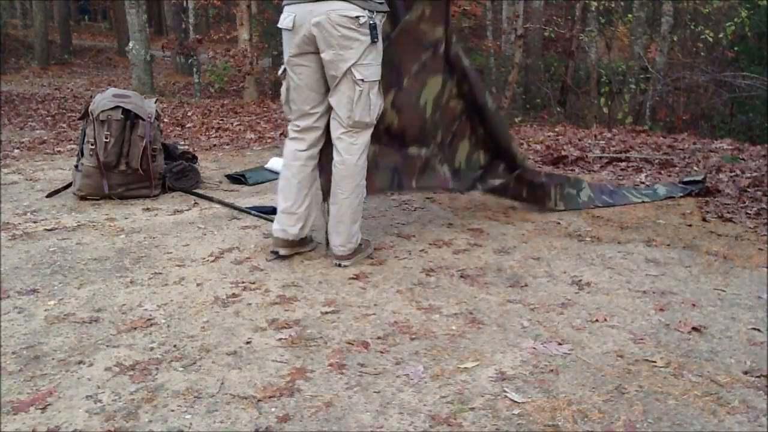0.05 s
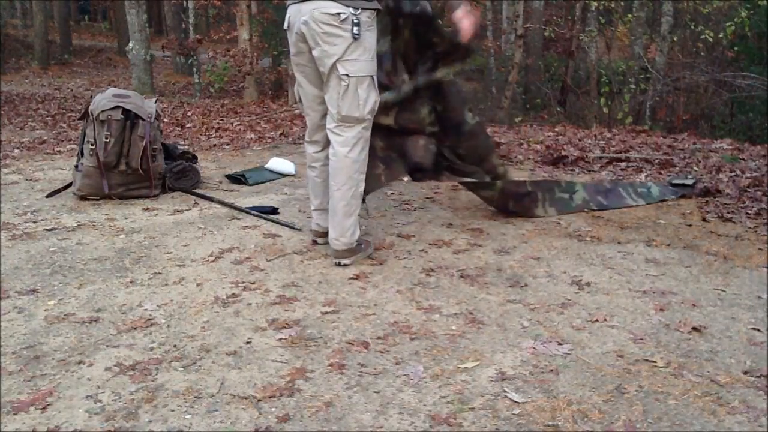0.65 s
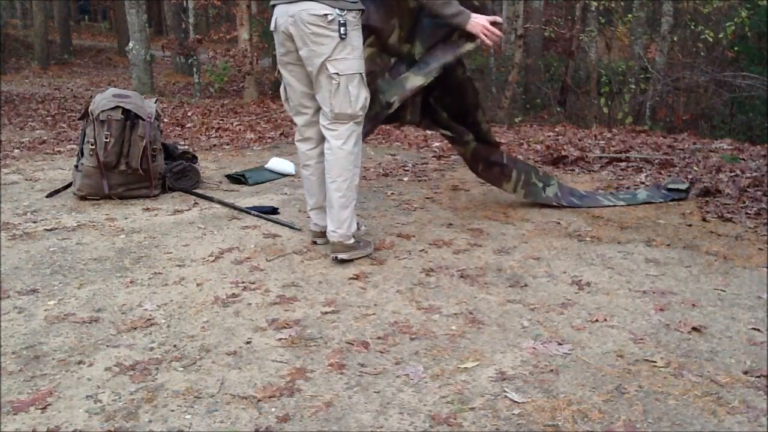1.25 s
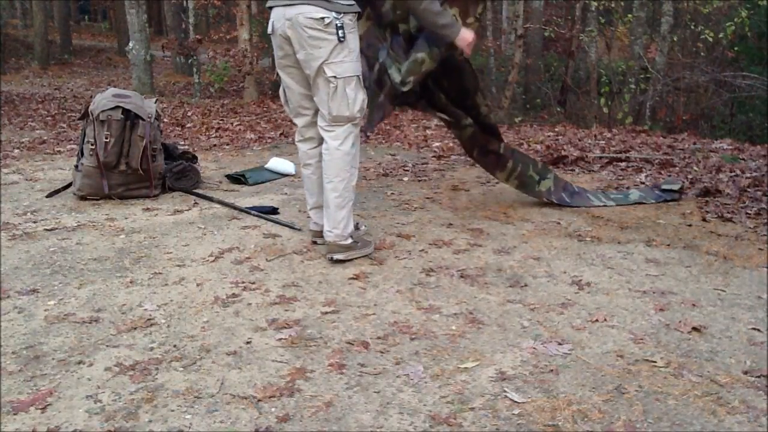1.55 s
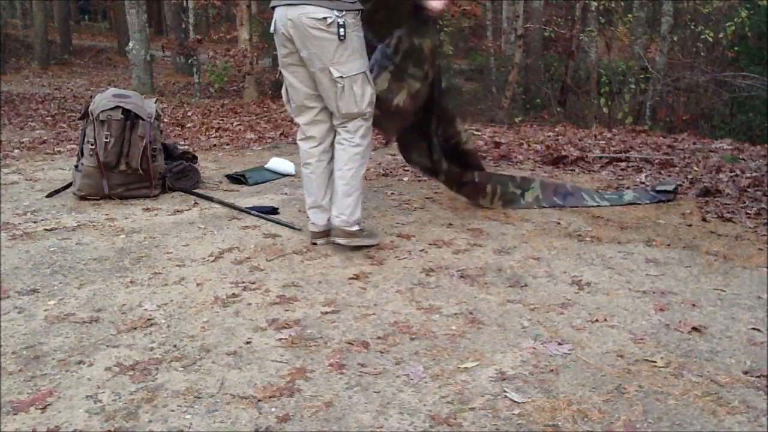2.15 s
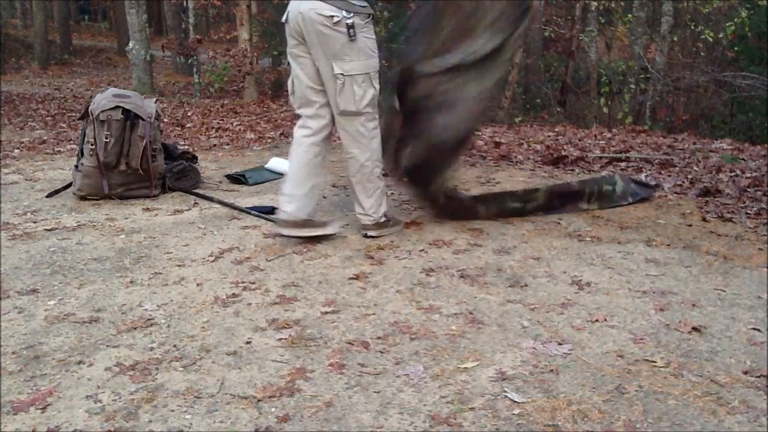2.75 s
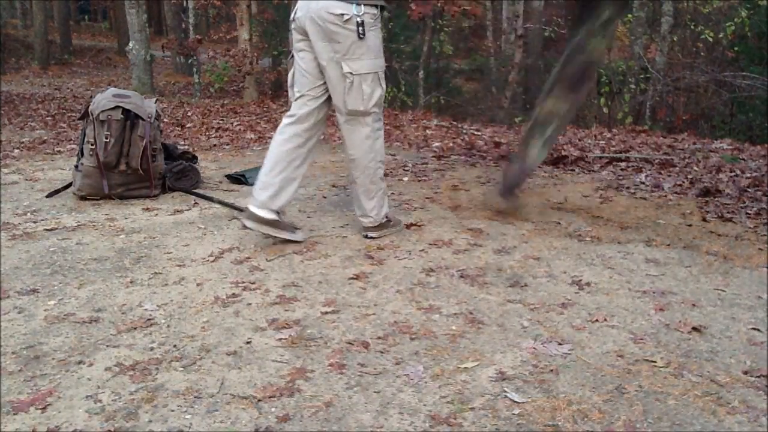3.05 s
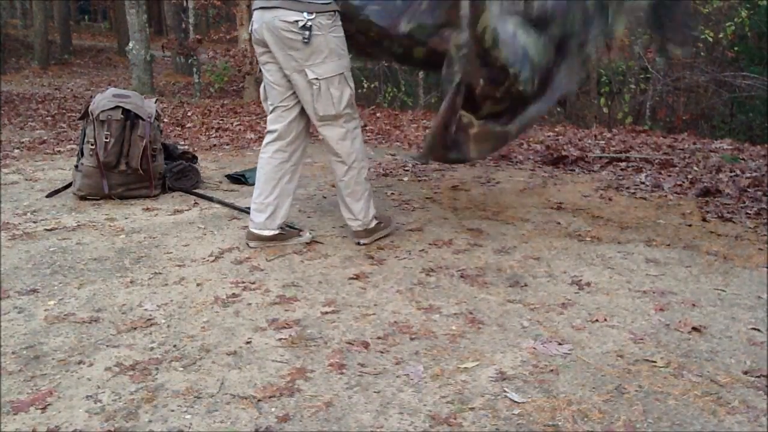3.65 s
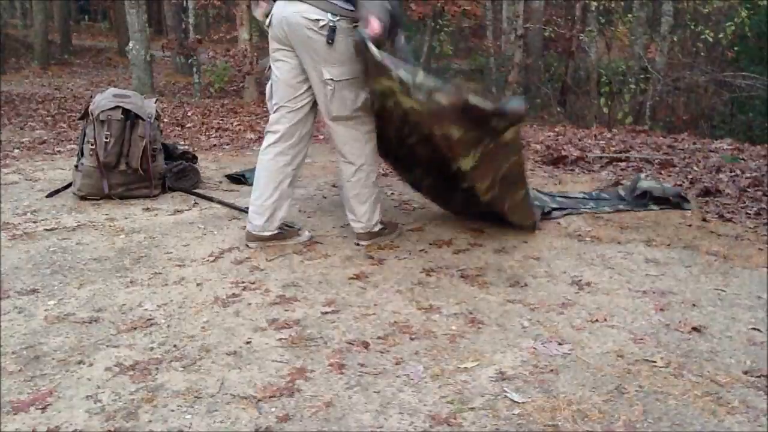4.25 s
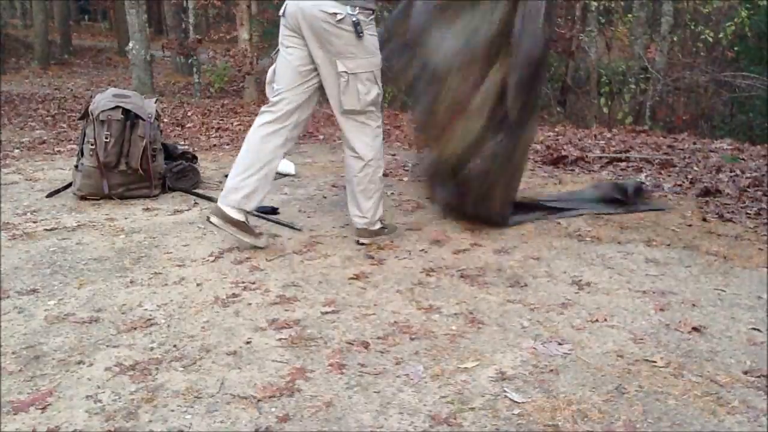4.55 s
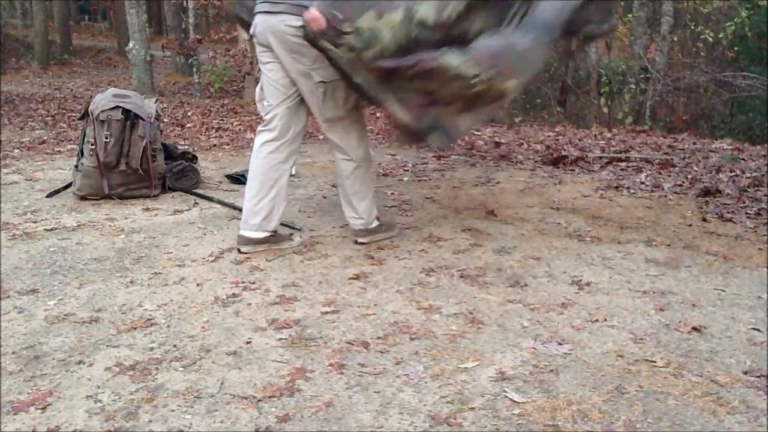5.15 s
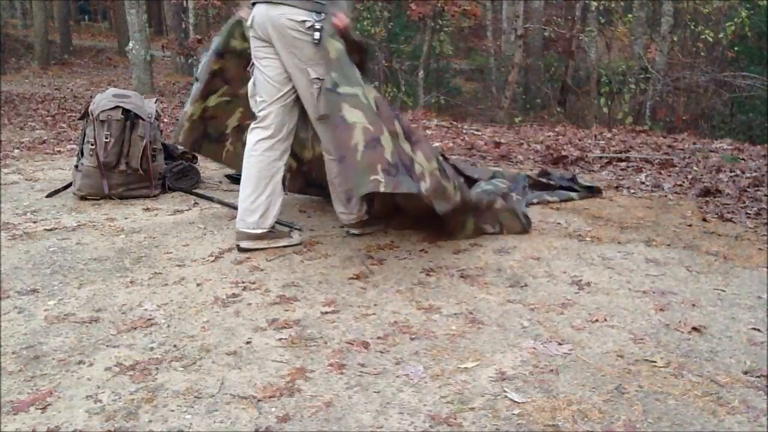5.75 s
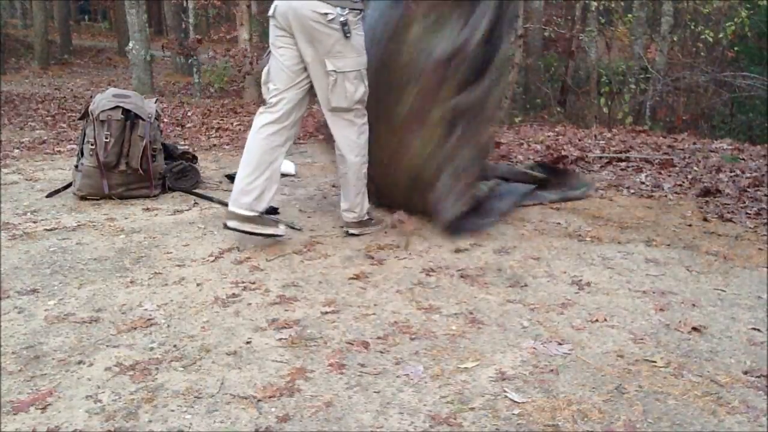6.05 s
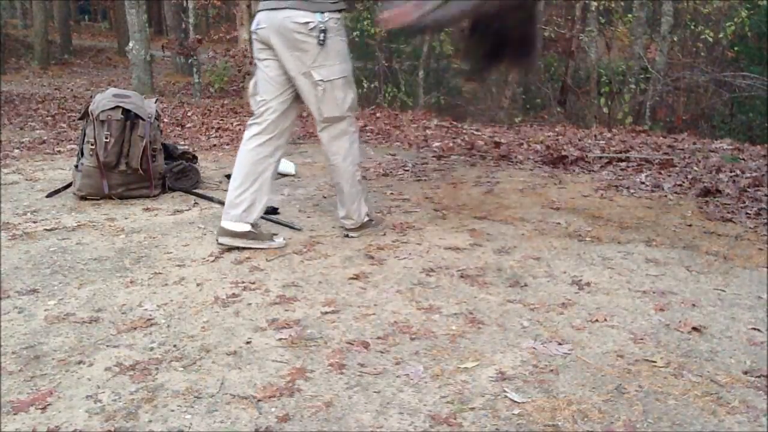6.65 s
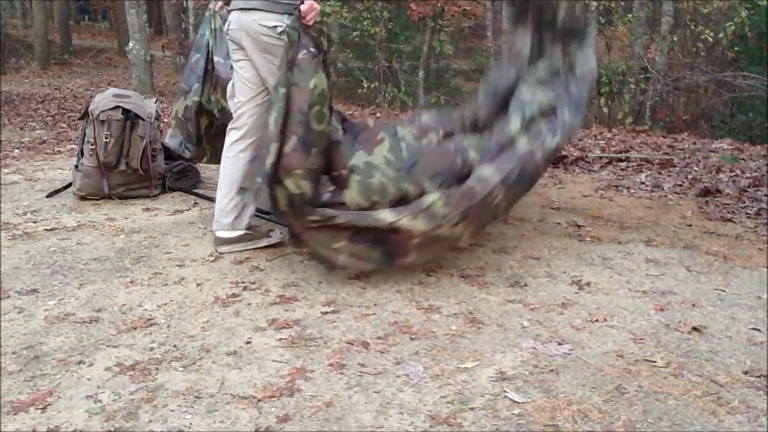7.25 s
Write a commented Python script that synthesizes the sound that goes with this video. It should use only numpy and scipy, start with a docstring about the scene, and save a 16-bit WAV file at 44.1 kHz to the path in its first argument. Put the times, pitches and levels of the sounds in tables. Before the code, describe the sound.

Soft cloth rustling gives way to three loud rounds of tarp flaps and swishes outdoors, with a far-off engine drone underneath.

```python
"""In the woods, on sandy ground: a fabric tarp is gathered up and shaken out three times near the mic.
Cloth slides on cloth with a hiss, its ribbed weave zips, folds buckle and creases crackle.
The sheet billows in soft puffs and its edge snaps taut; the trunks return a thin, dull tail.
Far off, traffic and two droning engines lie underneath."""
import sys
import numpy as np
from scipy import signal
from scipy.fft import rfft, irfft, next_fast_len
from scipy.io import wavfile
from scipy.ndimage import map_coordinates

SR = 44100
rng = np.random.default_rng(int(sys.argv[2]) if len(sys.argv) > 2 else 0)


def to_wav(s):
    """Save 16-bit WAV."""
    ch = np.atleast_2d(s).T  # columns
    pcm = np.round(np.clip(ch, -1, 1) * 32767)  # PCM
    wavfile.write(sys.argv[1], SR, pcm.astype(np.int16))


N = 322371
TIME = np.arange(N) / SR

# the arms whip the tarp upward: full speed at t/s, hold/s, relative level/dB
UPSWINGS = [(2.755, 0.054, -33.5), (4.519, 0.055, -28.5), (6.045, .15, -33.5)]
# the sheet flies out and unfurls: full speed at t/s, hold/s, relative level/dB
FLIGHTS = [(3.13, 0.15, -40), (4.96, 0.14, -36.5), (6.65, 0.22, -40.5)]
# it comes down and drags over sand and legs: full speed at t/s, hold/s, relative level/dB
DRAGS = [(4.065, 0.08, -42.5), (5.665, 0.056, -41), (7.015, 0.011, -43.5)]
# the hands pull in a length of cloth: full speed at t/s, hold/s, relative level/dB
HAND_PULLS = [(.14, 0.025, -52.5), (.31, .01, -58), (.49, .32, -53.5), (.57, 0.025, -49), (1.0, .1, -54),
              (1.32, .12, -54.5), (1.89, 0.0092, -54), (2.06, 0.3, -47), (2.61, 0.042, -50),
              (2.96, .02, -42.5), (3.49, 0.019, -46.5), (3.74, .01, -52), (3.94, .02, -47),
              (5.58, .01, -49.5), (5.83, 0.012, -57), (6.47, 0.042, -44)]
# cloth stirring between movements, quietest while bunched in the hands: t/s, relative level/dB
STIR_LEVELS = [(0, -57.5), (.4, -54.5), (.9, -68), (1.8, -62.5), (2.4, -52), (7.3, -57)]
# cloth pulled taut: t/s, level/dB, f/Hz, ripple decay/s
TAUT_SNAPS = [(2.0598, -16, 2450, 0.0033), (2.734, -17, 1090, .009), (2.792, -14, 1590, .0027),
              (2.8524, -14, 1890, .0045), (3.115, -20, 896, .0022), (3.203, -16, 980, 0.0092),
              (3.2329, -11, 1190, 0.0024), (3.279, -20.5, 540, 0.0081), (3.608, -21.5, 1700, 0.0035),
              (4.134, -22, 2200, 0.0096), (4.5102, -6.5, 1700, 0.0087), (4.5574, -14.5, 586, 0.0026),
              (4.612, -19, 890, 0.012), (4.8855, -12, 458, 0.002), (5.089, -20.5, 1200, .0048),
              (5.194, -21, 1430, 0.016), (5.957, -21.5, 900, 0.0059), (6.148, -8.5, 1493, 0.0079),
              (6.6655, -13, 1190, 0.0074), (7.032, -23, 1100, 0.0024)]
# the sheet catches air: middle t/s, half length/s, level/dB, f/Hz
AIR_PUFFS = [(0.607, 0.025, -48, 170), (2.774, 0.051, -37.5, 213), (4.065, 0.026, -36, 413),
             (4.52, 0.026, -25, 290), (4.625, 0.027, -31, 180), (4.889, 0.016, -27.5, 400),
             (4.977, 0.13, -37.5, 476), (5.68, 0.057, -37.5, 350), (6, 0.073, -39.5, 220),
             (6.66, 0.029, -36.5, 333)]
# weave zipping as the sheet flies out and unfurls, or on a hard jerk:
# middle t/s, half length/s, level/dB, start f/Hz, end f/Hz
WEAVE_ZIPS = [(3.192, 0.09, -38.5, 4740, 6100), (3.232, 0.0014, -24, 4940, 5100),
              (4.892, 0.1, -38, 4800, 5440), (5.08, 0.16, -46, 5870, 7140), (6.482, 0.069, -44, 4250, 4860),
              (6.737, 0.29, -44, 5380, 6250)]
# single creases flicking over: t/s, peak level/dB
CREASE_FLICKS = [(0.157, -35), (.56, -34), (.649, -38), (.707, -41), (1.098, -35), (1.67, -39.5),
                 (1.877, -36.5), (2.058, -23), (2.077, -26), (2.311, -33), (3.09, -21), (4.445, -23),
                 (6.034, -21), (6.497, -29)]
# spectrum of sliding cloth: f/Hz, relative level/dB
SLIDE_SPECTRUM = [(300, -22), (1000, -3), (2500, -3.5), (4500, -1.5), (7000, 0), (10000, 0), (15000, -3.5)]
# spectrum of buckling folds: f/Hz, relative level/dB
FOLD_SPECTRUM = [(50, -48.5), (130, -6), (350, 2.5), (800, 0.5), (1400, 2), (2600, -1.5), (4000, -7),
                 (7000, -19.5), (15000, -23)]
# spectrum of crease clicks: f/Hz, relative level/dB
CREASE_SPECTRUM = [(500, -24), (2000, 6), (4500, 6), (9000, 2.5), (15000, -11.5)]
# spectrum of the distant road: f/Hz, relative level/dB
ROAD_SPECTRUM = [(25, -27), (50, -11), (70, -12), (100, -5), (150, 0.5), (320, -1.5), (550, 2), (900, 5),
                 (1300, 0.5), (2000, -13), (4000, -24), (15000, -25)]
# the higher engine: t/s, firing f/Hz, level/dB of harmonics 1, 2, 3
HIGH_DRONE = [(0, 83.3, -73, -84, -73), (1.1, 82.7, -62.5, -67, -56.5), (1.7, 83.64, -65, -54, -63.5),
              (2.2, 82, -65, -53, -60.5), (2.8, 83.3, -71, -56.5, -66.5), (4.3, 81.8, -65.5, -63, -56.5),
              (7.3, 82.5, -69, -61.5, -84)]
# the lower engine: t/s, firing f/Hz, level/dB
LOW_DRONE = [(0, 73.5, -66), (2.2, 72, -62.5), (4.2, 71.2, -72), (5.5, 65.2, -77), (7.3, 67.3, -80.5)]


def handling():
    """The tarp's movements set how hard the cloth slides and buckles: two level curves in dB."""
    whip = strokes(UPSWINGS, attack_s=.065, release_s=.13)
    settling = from_db(-13.5) ** 2 * strokes(FLIGHTS, attack_s=.064, release_s=.67)  # the sheet sinks
    flight = strokes(FLIGHTS, attack_s=.14, release_s=.078) + settling
    drag = strokes(DRAGS, attack_s=.03, release_s=.022)
    stir_db, = in_time(STIR_LEVELS)
    hands = strokes(HAND_PULLS, attack_s=.046, release_s=.084) + from_db(stir_db) ** 2
    hiss_db = 10 * np.log10(whip + flight + drag + hands)
    crumple = whip * (whip / whip.max()) ** .2  # the harder the whip, the more of it buckles
    folds_db = 10 * np.log10(crumple + from_db(.54) ** 2 * flight + drag + from_db(-.55) ** 2 * hands)
    return hiss_db, np.interp(TIME + .0065, TIME, folds_db)  # folds buckle just before the cloth slides


def strokes(rows, attack_s, release_s):
    """Power of a set of movements: each swells up to speed, holds and dies away."""
    power, t = 0, TIME[::SR // 1000]
    for s, hold, db in rows:
        rise = (np.maximum(s - t, 0) / attack_s) ** 1.6
        fall = np.maximum(t - s - hold, 0) / release_s
        power += (from_db(db) * np.exp(-np.minimum(rise + fall, 20))) ** 2
    return np.interp(TIME, t, power)


def sliding(level_db):
    """Threads catch and let go: a fine hiss with ticks, which stand apart when the cloth moves slowly."""
    per_s = 1500 * from_db(.8 * (np.clip(level_db, -62, -30) + 35.5))
    friction = rng.standard_normal(N) + from_db(-10) * grains(per_s, spread_db=7.5)
    return from_db(level_db + 2 + 1.2 * drift(70)) * colour(friction, SLIDE_SPECTRUM)


def buckling(level_db):
    """Folds pop over, more of them the harder the cloth moves."""
    per_s = 3500 * from_db(.5 * (np.clip(level_db, -65, -25) + 40))
    pops = grains(per_s, spread_db=-1)
    return from_db(level_db + 2.5 + 1.7 * drift(90)) * colour(pops, FOLD_SPECTRUM)


def hem_jerks(folds_db, hard_db=-11.7, panel_hz=566, flaps_per_s=18, fast_db=-44.5, flap_s=.0022):
    """List the snaps, the panel's deeper pop behind a hard one, and chance flaps in fast movement."""
    pops = [(s, db - 4, panel_hz, decay) for s, db, _, decay in TAUT_SNAPS if db > hard_db]
    starts = np.flatnonzero((rng.random(N) < flaps_per_s / SR) & (folds_db > fast_db))
    flap_hz = np.minimum(1120 * 2 ** (.83 * rng.standard_normal(N)), SR / 10)
    flaps = [(i / SR, folds_db[i] + 10, flap_hz[i], flap_s) for i in starts]
    return TAUT_SNAPS + pops + flaps


def snapping(jerks, ripples=12, gap_s=.0012, ripple_db=-4.5, direct_db=-12.5, crack_db=-11):
    """One push-pull pulse of air, then lesser ones of uneven width as the jerk runs along the hem."""
    out, t = np.zeros(N), TIME[:SR // 20] - .005
    for s, db, hz, decay in jerks:
        lateness, detune = rng.uniform(-1, 1, (2, ripples))
        delays = np.cumsum(gap_s * (1 + lateness / 2))
        sizes = np.r_[1, from_db(ripple_db) * np.exp(-delays / decay) * rng.choice([-1, 1], ripples)]
        pitches = hz * np.r_[1, 2 ** (.42 * detune)]
        phase = 2 * np.pi * pitches[:, None] * (t - np.r_[0, delays][:, None])
        pulses = sizes @ (-phase / (1 + phase ** 2 / 2) ** 3)
        # the taut pocket of cloth rings for a cycle or two: a hollow pop
        pop = signal.lfilter(*signal.iirpeak(hz, Q=1.8, fs=SR), pulses) + from_db(direct_db) * pulses
        pop = butter(pop, 2, hz / 4.1, "high")  # slow pressure leaks round the edge of the cloth
        fizz = rng.standard_normal(len(t)) * np.exp(-np.abs(t) / decay) * (t > 0)
        snap = pop / np.abs(pop).max() + from_db(crack_db) * butter(fizz, 1, 6000)
        at = round((s + t[0]) * SR)
        out[at:at + len(t)] += from_db(db) * snap[:N - at]
    return out


def billowing():
    """Broad panels flutter and shove the air in soft puffs; the larger the panel, the lower."""
    out, flutter = np.zeros(N), grains(per_s=1800, spread_db=2.5)
    for middle, half, db, hz in AIR_PUFFS:
        panel = signal.lfilter(*signal.iirpeak(hz, Q=1, fs=SR), flutter + 1e-18)
        panel = butter(panel, 1, [hz / 2, 2 * hz], "band")
        out += from_db(db) * swell(middle, half) * rms_one(panel)
    return out


def zipping(scatter_hz=890):
    """Ribs of the weave cross at a rate that rises with the sliding speed."""
    out = np.zeros(N)
    scatter = rms_one(butter(rng.standard_normal((2, N)), 2, scatter_hz))
    for middle, half, db, start_hz, end_hz in WEAVE_ZIPS:
        rib_hz = np.interp(TIME, [middle - half, middle + half], [start_hz, end_hz])
        phase = 2 * np.pi * np.cumsum(rib_hz) / SR
        rasp = scatter[0] * np.sin(phase) + scatter[1] * np.cos(phase)
        out += from_db(db) * swell(middle, half) * rasp
    return out * from_db(2.3 * drift(60))


def crinkling(hiss_db, flicks_per_s=4, soft_db=-43, decay_s=.0068):
    """Creases give way in short runs of tiny clicks; chance ones stand out while the hiss is soft."""
    out, t = np.zeros(N), TIME[:SR // 25]
    clicks = colour(grains(per_s=3000, spread_db=-2), CREASE_SPECTRUM)
    flicks = (rng.random(N) < flicks_per_s / SR) & (hiss_db < soft_db)
    chance_flicks = [(i / SR, hiss_db[i] + 10) for i in np.flatnonzero(flicks[:-len(t)])]
    for s, db in CREASE_FLICKS + chance_flicks:
        span = slice(round(s * SR), round(s * SR) + len(t))
        run = clicks[span] * np.exp(-t / decay_s)
        out[span] += from_db(db) * run / np.abs(run).max()
    return out


def trunk_echo(x, t60_s=.2, tail_db=-46.5, delay_s=.02, top_hz=3500):
    """The trunks scatter a thin, dull tail back to the mic."""
    t = TIME[:SR]
    response = from_db(tail_db - 60 * t / t60_s) * rng.standard_normal(len(t)) * (t > delay_s)
    return butter(signal.fftconvolve(x, response)[:N], 1, top_hz)


def traffic(level_db=-44.5):
    """A far-off road: a dull wash that wavers slightly."""
    return from_db(level_db + .5 * drift(4.56)) * colour(rng.standard_normal(N), ROAD_SPECTRUM)


def engine(rows, waver_db):
    """A distant engine drones at low multiples of its firing rate, wavering on the way by waver_db."""
    hz, *levels = in_time(rows)
    phase = 2 * np.pi * (np.cumsum(hz) / SR + rng.random())
    gains = [from_db(db + waver_db * drift(4.6)) for db in levels]
    return np.sqrt(2) * sum(gain * np.sin(k * phase) for k, gain in enumerate(gains, 1))


def from_db(db):
    """Decibels to gain."""
    return 10 ** (np.asarray(db) / 20)


def rms_one(x):
    """Scale to unit power."""
    return x / np.sqrt(np.mean(x ** 2) + 1e-20)


def in_time(rows):
    """Each column of a timed curve, at every sample."""
    s, *columns = np.transpose(rows)
    return [np.interp(TIME, s, column) for column in columns]


def swell(middle, half):
    """A bell-shaped rise and fall."""
    return np.exp(-np.minimum(((TIME - middle) / half) ** 2, 60))


def drift(per_s):
    """Smooth random wander, changing about per_s times a second; rms 1."""
    knots = rng.standard_normal(8192)
    return rms_one(map_coordinates(knots, [TIME * per_s], order=2, mode="wrap"))


def grains(per_s, spread_db):
    """Random clicks of uneven size and either sign; rms 1."""
    sizes = from_db(spread_db * np.minimum(rng.exponential(1, N), 4)) * rng.choice([-1, 1], N)
    return rms_one(sizes * (rng.random(N) < per_s / SR) / np.sqrt(per_s))


def butter(x, order, hz, kind="low"):
    """Low-, high- or band-pass filter."""
    return signal.sosfilt(signal.butter(order, hz, kind, fs=SR, output="sos"), x)


def colour(x, spectrum):
    """Causal (minimum-phase) filter that follows a spectrum; rms 1."""
    size = 2 * next_fast_len(N // 2 + SR // 10)
    hz, db = np.transpose(spectrum)
    bin_hz = np.arange(size // 2 + 1) * SR / size
    gain = from_db(np.interp(np.log(bin_hz + 1), np.log(hz), db))
    cepstrum = irfft(np.log(gain))[:size // 2]
    response = np.exp(2 * rfft(cepstrum, size))
    return rms_one(irfft(rfft(x, size) * response)[:N])


def scene():
    """The tarp up front among the trees, road and engines in the distance; mono."""
    hiss_db, folds_db = handling()
    tarp = sliding(hiss_db) + buckling(folds_db) + billowing() + zipping() + crinkling(hiss_db)
    tarp += snapping(hem_jerks(folds_db))
    distance = traffic() + engine(HIGH_DRONE, waver_db=0) + engine(LOW_DRONE, waver_db=2)
    return (tarp + trunk_echo(tarp) + distance)[None]


def record(dry):
    """The microphone sheds its lowest bass; the top is cut steeply."""
    low_hz, top_hz = 61.3, 15350
    thin = butter(dry, 3, low_hz, "high")
    return signal.sosfilt(signal.ellip(12, .1, 80, top_hz, fs=SR, output="sos"), thin)


dry = scene()
out = record(dry)
to_wav(out)
```